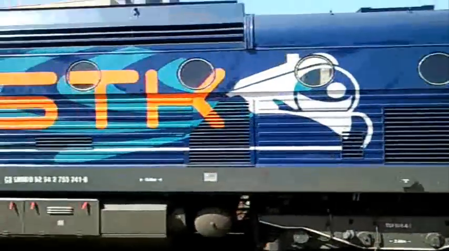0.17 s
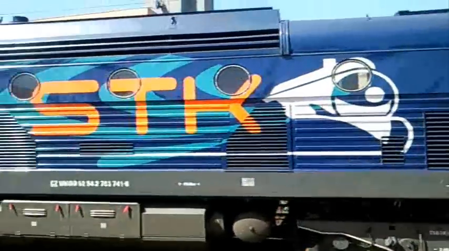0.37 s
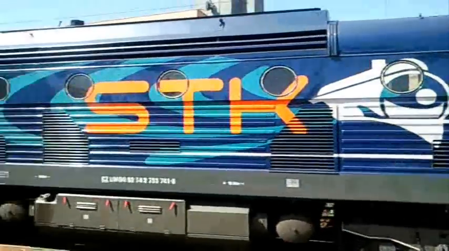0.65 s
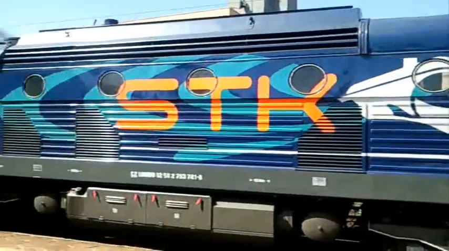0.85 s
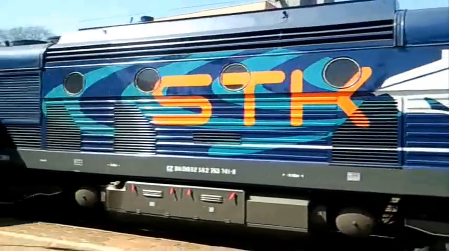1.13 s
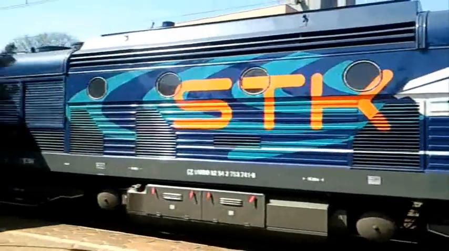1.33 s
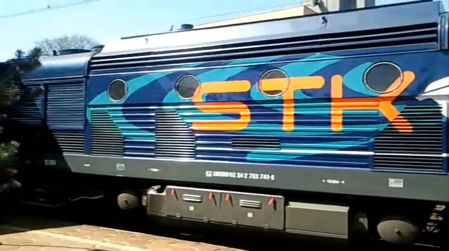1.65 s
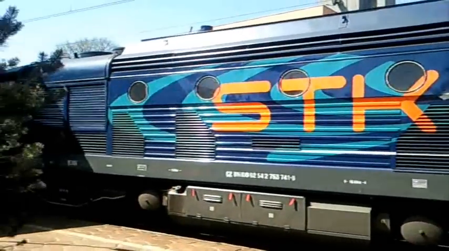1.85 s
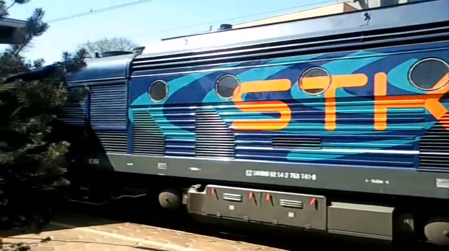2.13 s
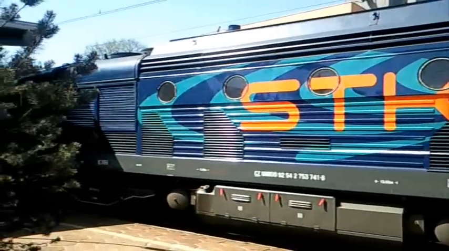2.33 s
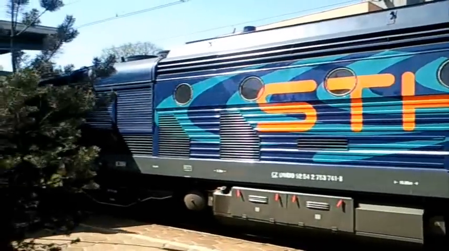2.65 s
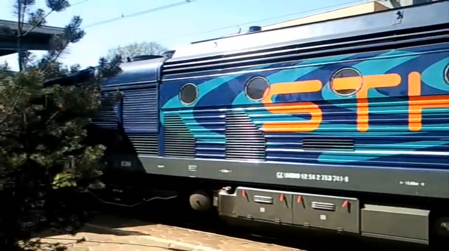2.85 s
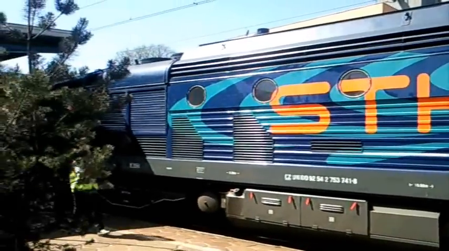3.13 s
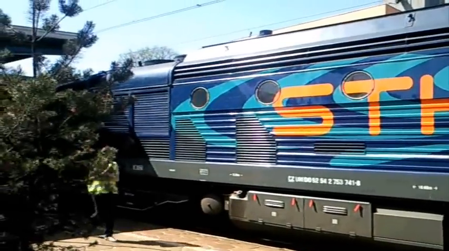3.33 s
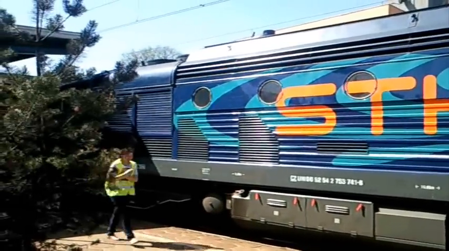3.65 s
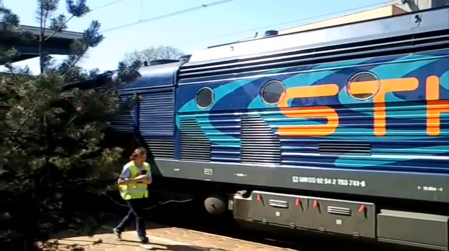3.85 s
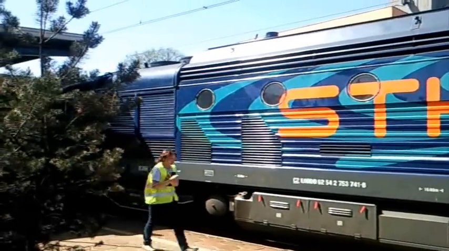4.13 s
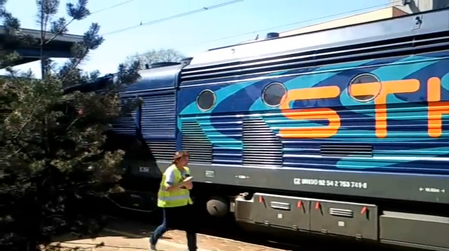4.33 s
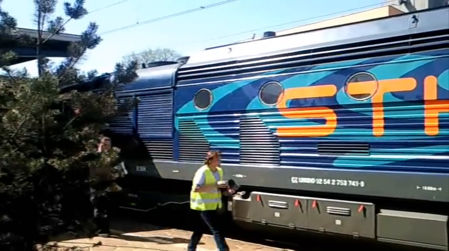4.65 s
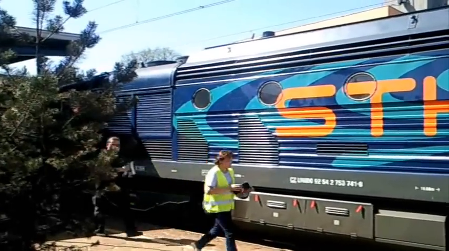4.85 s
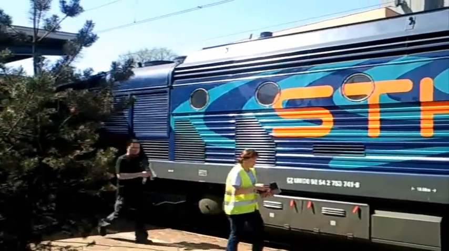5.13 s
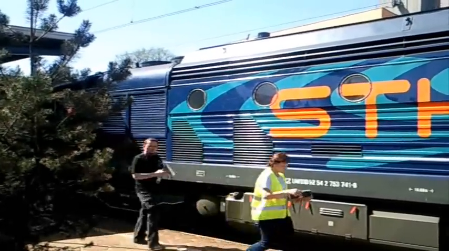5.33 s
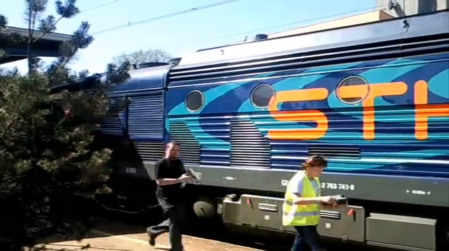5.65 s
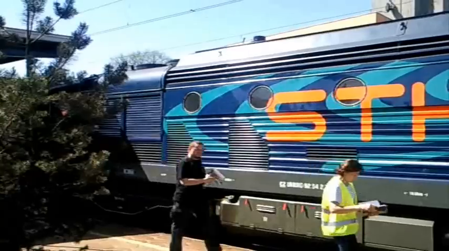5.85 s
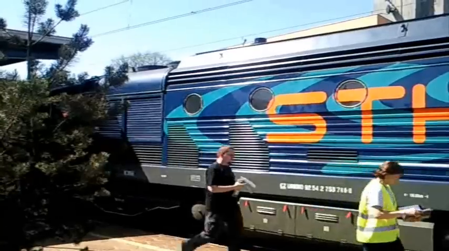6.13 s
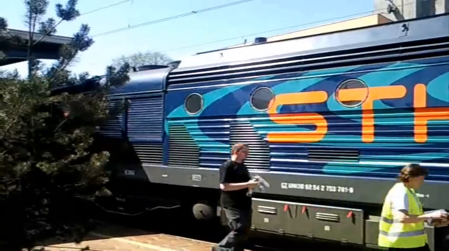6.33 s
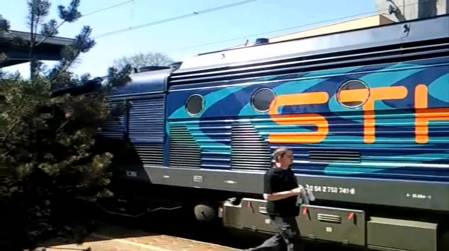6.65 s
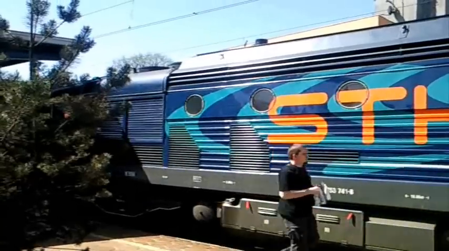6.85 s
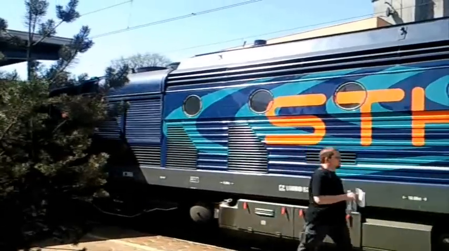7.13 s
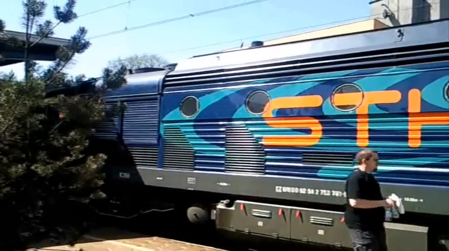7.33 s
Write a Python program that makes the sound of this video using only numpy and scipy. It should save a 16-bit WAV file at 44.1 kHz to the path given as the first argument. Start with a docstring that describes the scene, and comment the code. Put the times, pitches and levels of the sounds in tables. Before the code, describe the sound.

On an open-air platform, a standing electric locomotive runs its cooling blowers: a steady roar of air with a fluttering whine and a throbbing hum. Wind buffets the microphone hard for the first three seconds, popping and briefly overloading it, then eases to scattered thumps. A thin, faint squeal comes early, and a short puff of compressed air sounds about halfway, followed by a tiny chirp.

```python
"""An open-air platform, beside a standing electric locomotive with its cooling blowers running.
Air roars through the ducts and grilles, blades and motors whine, and two fans beat into a throb.
Gusts buffet the microphone, hard for the first three seconds, pop on its port and overload it.
A few thin squeals come and go, and near four seconds a valve lets off one puff of compressed air."""
import sys
import numpy as np
from scipy import signal
from scipy.fft import rfft, irfft
from scipy.io import wavfile

SR = 44100
rng = np.random.default_rng(int(sys.argv[2]) if len(sys.argv) > 2 else 0)


def transcribe(u):
    """Save the signal u as a 16-bit wav file named by the first command-line argument.

    u: samples, shape (n,) or (channels, n), limited to [-1, 1]; the rate is SR.
    q: integer samples, one column per channel.
    """
    v = np.clip(np.atleast_2d(u).T, -1, 1)
    q = np.round(v * 32767).astype(np.int16)
    wavfile.write(sys.argv[1], SR, q)


N = 329868
TIME = np.arange(N) / SR
FREQS = np.maximum(np.fft.rfftfreq(N, 1 / SR), 1)


def from_db(db):
    """Decibels to gain."""
    return 10 ** (np.asarray(db) / 20)


def rms_one(x):
    """Scale to an rms of 1."""
    return x / np.sqrt(np.mean(x ** 2) + 1e-20)


def in_time(rows):
    """Read rows of (seconds, value) at every sample."""
    return np.interp(TIME, *np.transpose(rows))


def at_hz(rows, hz):
    """Read rows of (Hz, value) on a log-frequency axis."""
    row_hz, values = np.transpose(rows)
    return np.interp(np.log(hz), np.log(row_hz), values)


def drift(rate_hz):
    """A smooth random wander with an rms of 1, mostly slower than the given rate."""
    step, settle = 40, 2000
    pole = np.exp(-2 * np.pi * rate_hz * step / SR)
    white = rng.standard_normal(N // step + settle + 2)
    slow = signal.lfilter([1], [1, -2 * pole, pole * pole], white)[settle:]
    return np.interp(np.arange(N) / step, np.arange(len(slow)), rms_one(slow))


def swell(centre_s, half_length_s, edge=2):
    """A rise and fall of height 1: a bell, or squarer with a higher edge."""
    distance = np.abs(TIME - centre_s) / half_length_s
    shape, near = np.zeros(N), distance < 2
    shape[near] = np.exp(-2 * distance[near] ** edge)
    return shape


def noise(spectrum_db):
    """Steady noise of rms 1 with the given spectrum."""
    return rms_one(irfft(rfft(rng.standard_normal(N)) * from_db(spectrum_db), N))


def tone(hz, waver, rate_hz):
    """A sine of rms 1 on a pitch curve; a share of it (waver, 0-1) varies at random."""
    amplitude = np.sqrt(2 * (1 - waver ** 2)) + waver * (drift(rate_hz) + 1j * drift(rate_hz))
    turns = np.cumsum(hz * np.ones(N)) / SR
    return np.real(amplitude * np.exp(2j * np.pi * turns))


# Rushing air, heard from the platform. Each row: frequency in Hz, relative level in dB.
AIRFLOW_SPECTRUM = [(30, -6.5), (70, -1.5), (170, -2), (330, -1.5), (480, -4), (530, -5.5), (650, -8.5),
                    (800, -6), (1080, -10.5), (1350, -6), (1650, -9), (2300, -6), (2600, -8), (2850, -15.5),
                    (3200, -16.5), (5300, -19), (6600, -25), (7900, -25.5)]
# Duct resonances. Each row: centre in Hz, width in Hz, lift above the airflow in dB.
DUCT_RESONANCES = [(167, 31, 2.5), (267.5, 42, 5), (335, 32, 1), (485, 38, 3.5), (981, 12, 1),
                   (1260, 270, 1), (1866, 100, 2.5)]
# The roar at the microphone. Each row: time in seconds, level in dB.
ROAR_LEVEL = [(0, -22.5), (2.0, -23.5), (5.7, -24.5), (7.48, -23.5)]
# The roar's treble, nearly steady, drifting by about half a decibel.
# Each row: time in seconds, gain in dB.
ROAR_TREBLE = [(0, 0), (1.1, 0), (2.0, -.3), (3.4, 0.5), (5.3, -0.2), (7.48, 0)]

def blower_roar(churn_db=0.69, treble_from_hz=670):
    """Turbulent air rings in the ducts and leaves through the side grilles, never quite evenly."""
    ducts_db = sum(db / (1 + (2 * (FREQS - hz) / width) ** 2) for hz, width, db in DUCT_RESONANCES)
    air = noise(at_hz(AIRFLOW_SPECTRUM, FREQS) + ducts_db)
    bass = irfft(rfft(air) / (1 + (FREQS / treble_from_hz) ** 4), N)
    treble = from_db(in_time(ROAR_TREBLE)) * (air - bass)
    return from_db(in_time(ROAR_LEVEL) + churn_db * drift(7.4)) * (bass + treble)


# Sizzle at the top of the hiss. Each row: lower and upper edge in Hz, gain of a full fleck in dB,
# threshold in standard deviations (higher makes flecks rarer).
FLECK_BANDS = [(6900, 7550, 5.5, .8), (7550, 8100, 7.5, .3)]

def flickering_top(hiss, gap_db=-18, flicker_hz=30):
    """The very top of the hiss flickers in short flecks, a fine sizzle."""
    spectrum = rfft(hiss)
    out = irfft(spectrum * (FREQS < FLECK_BANDS[0][0]), N)
    for low, high, db, threshold in FLECK_BANDS:
        band = irfft(spectrum * (FREQS >= low) * (FREQS < high), N)
        gap = (1 - np.tanh(4 * (drift(flicker_hz) - threshold))) / 2
        out += from_db(db + gap_db * gap) * band
    return out


# The side grille, higher and stronger while the microphone is close to it.
# Each row: time in seconds, centre in Hz, level in dB.
GRILLE_RUSH = [(0, 2776, -36), (.8, 2740, -33.5), (1.3, 2588, -42.5), (7.48, 2572, -39.5)]

def grille_rush(width_hz=140, surge_db=4.5, surge_hz=3.2):
    """Air sheds eddies off the slats: a narrow band of noise that swells and sinks."""
    rows = np.array(GRILLE_RUSH)
    hz, level_db = in_time(rows[:, [0, 1]]), in_time(rows[:, [0, 2]])
    surge = from_db(surge_db * drift(surge_hz))
    return from_db(level_db) * rms_one(surge * tone(hz, waver=0.92, rate_hz=width_hz))


# Blower tones, heard from the platform.
# Each row: multiple of the shaft rate, level in dB, wavering share from 0 to 1.
SHAFT_ORDERS = [(9.71, -42, 0.4), (26.36, -44, 0.6), (44.5, -47.5, 0.3), (45.05, -49, 0.3), (47.1, -46, .5),
                (49.6, -51, 0.5), (94, -51, 0.9), (114.2, -50, 0.4), (148.3, -43.5, 0.4)]

def blower_tones(shaft_hz=16.44, wander=0.000974, whine_hz=6008.5, whine_db=-59, churn_hz=4.5):
    """Blade and motor tones ride on one shaft, under a faint high whine; churning air roughens each."""
    shaft = shaft_hz * (1 + wander * drift(2.01))
    blades = sum(from_db(db) * tone(order * shaft, waver, churn_hz) for order, db, waver in SHAFT_ORDERS)
    return blades + from_db(whine_db) * tone(whine_hz, waver=.3, rate_hz=churn_hz)


def main_whine(hz=919.6, level_db=-37, flutter_hz=15.9, flutter_depth=.65, unsteady=0.1616):
    """The strongest blade tone holds its pitch and flutters unevenly, about once a turn of the shaft."""
    turns = np.cumsum(flutter_hz * (1 + unsteady * drift(4))) / SR
    flutter = 1 + flutter_depth * np.cos(2 * np.pi * turns)
    return from_db(level_db) * flutter * tone(hz, waver=.45, rate_hz=18)


def fan_hum(hum_hz=279.3, beat_hz=2.96, wander=0.0013, waver=0.48, churn_hz=11):
    """Two big fans on one supply run just out of step, so their hum throbs three times a second."""
    hz = hum_hz * (1 + wander * drift(2.5))
    slower_fan = from_db(-34) * tone(hz, waver, churn_hz)
    faster_fan = from_db(-37.5) * tone(hz + beat_hz, waver, churn_hz)
    return slower_fan + faster_fan


STRONG_GUST_DB = -15
# Wind across the platform: two gusts, then a light breeze. Each row: time in seconds, strength in dB.
WIND_STRENGTH = [(0, -19), (.5, -18.5), (1.0, -24), (1.5, -27.5), (1.63, -18), (2.05, -16), (2.62, -25),
                 (3.0, -32), (3.6, -33), (4.3, -37), (6.6, -42), (7.48, -30)]
# Large eddies right on the microphone. Each row: centre in seconds, half-length in seconds,
# strength above the wind in dB, extra treble in dB.
LARGE_EDDIES = [(.009, .0072, 9.5, -6), (0.036, 0.024, 7, 3.5), (0.133, 0.031, 7, 5),
                (0.206, 0.022, 7.5, 3), (0.28, 0.026, 4, 1), (0.337, .012, 9, 0), (0.364, .026, 12.5, -5),
                (0.446, 0.092, 3.5, -1.5), (0.526, 0.0089, 6.5, -1), (0.59, .015, 7.5, -3),
                (0.614, .01, 9.5, 2), (0.652, .014, 8.5, 3), (0.721, 0.023, 7.5, -2),
                (0.827, 0.031, 9.5, 2.5), (.923, 0.035, 6.5, -1), (1.006, .04, 4, -2), (1.086, .013, 7, 2),
                (1.238, .037, 10, -2), (1.356, 0.052, 6.5, -2), (1.559, 0.044, 12, -11),
                (1.637, 0.058, 5, 2), (1.683, 0.017, 10.5, -5), (1.769, .025, 5.5, -1),
                (1.872, 0.019, 11.5, -5), (1.91, .049, 5, -3), (1.957, .021, 10.5, -2),
                (1.983, 0.012, 10.5, -2), (2.011, 0.014, 8, 0), (2.049, 0.027, 7, -5), (2.103, .024, 8, 2),
                (2.145, .02, 3, 0), (2.253, .025, 13.5, -8), (2.282, 0.029, 12.5, -1),
                (2.317, 0.019, 10, -3), (2.39, 0.021, 10, -1), (2.441, 0.015, 11, -2),
                (2.575, 0.065, 8.5, 6), (2.739, 0.06, 17.5, 0.5), (2.83, 0.047, 11, 4),
                (2.919, 0.027, 10.5, -4), (3.104, 0.027, 5, -2), (3.252, 0.047, 12, 2), (3.46, .075, 14, 1),
                (3.672, 0.018, 10, -2), (3.739, 0.025, 16, 0), (4.857, .053, 19, -2), (5.037, 0.1, 11, 2),
                (5.317, .025, 11, -4), (5.49, .025, 17, -2), (6.849, 0.036, 17.5, -8),
                (6.978, 0.065, 15.5, -1), (7.357, .036, 12, 0)]

def eddies(swirl_db=1.8, swirl_hz=7.5, calm_swirl=.08, lumpy_db=2.3, evening_out=.35):
    """Eddies at the microphone set the wind's strength, extra treble and fast lumps, all in dB."""
    lumps_db = lumpy_db * drift(60)
    gust_db, crackle_db = in_time(WIND_STRENGTH), 0
    depth_db = swirl_db + calm_swirl * (STRONG_GUST_DB - gust_db)   # light wind is more fitful
    gust_db += depth_db * drift(swirl_hz)
    for centre_s, half_length_s, db, treble_db in LARGE_EDDIES:
        eddy = swell(centre_s, half_length_s)
        peak_db = np.interp(centre_s, *np.transpose(WIND_STRENGTH)) + db
        gust_db += eddy * (peak_db - gust_db)   # a large eddy takes over from the swirls
        lumps_db *= 1 - evening_out * eddy   # and sweeps away some of the small lumps
        crackle_db += eddy * treble_db
    return gust_db, crackle_db, lumps_db


# Rumble on the microphone in a strong gust. Each row: frequency in Hz, relative level in dB.
RUMBLE_SPECTRUM = [(20, -14), (45, -4), (85, 1.5), (150, 1.5), (230, -1), (350, -3), (550, -12),
                   (800, -23.5), (1200, -31.5), (2000, -45), (4000, -62)]
# How the rumble brightens. Each row: frequency in Hz, extra dB for each dB of gust.
RUMBLE_GROWTH = [(50, -0.23), (150, -0.09), (400, 0.74), (1000, 1.28)]

def wind(patchy_db=1.6, treble_hz=400):
    """Eddies make lumpy pressure at the port; faster air sheds smaller ones, so gusts are brighter."""
    gust_db, crackle_db, lumps_db = eddies()
    edges_hz = 14 * 2 ** np.arange(0, 8.6, .5)   # half octaves
    white = rng.standard_normal((2, N))
    out, power = 0, 0
    for k, (low, high) in enumerate(zip(edges_hz, edges_hz[1:])):
        hz = np.sqrt(low * high)
        bandpass = signal.butter(2, [low, high], "band", fs=SR, output="sos")
        band = from_db(at_hz(RUMBLE_SPECTRUM, hz)) * signal.sosfilt(bandpass, white[k % 2])
        power += np.mean(band ** 2)
        force_db = (gust_db - STRONG_GUST_DB) * (1 + at_hz(RUMBLE_GROWTH, hz))
        treble_share = hz ** 2 / (hz ** 2 + treble_hz ** 2)   # an eddy colours the upper bands
        out += band * from_db(force_db + treble_share * crackle_db + patchy_db * drift(29))
    lumps = rms_one(from_db(lumps_db))   # small eddies shake all bands together
    return from_db(STRONG_GUST_DB) * lumps * out / np.sqrt(power)


# Tiny fast eddies right at the microphone port.
# Each row: start in seconds, pitch in Hz, peak of the envelope in dB.
PORT_POPS = [(.336, 400, -6), (.709, 620, -10), (.836, 680, -8), (1.623, 560, -10), (1.686, 600, -5),
             (1.727, 650, -9), (1.764, 620, -5), (1.791, 600, -2), (1.867, 700, -2.5), (1.948, 480, -8),
             (2.012, 650, -5.5), (2.036, 620, -7), (2.098, 680, -4), (2.244, 220, -2), (2.305, 700, -9),
             (2.375, 380, -4)]

def pops(rise_s=.00065):
    """Each pop is a pressure kick that swings once or twice and is gone."""
    out = np.zeros(N)
    age = np.arange(SR // 50) / SR
    envelope = age / rise_s * np.exp(1 - age / rise_s)
    for start_s, hz, db in PORT_POPS:
        start = int(start_s * SR)
        out[start:start + len(age)] += from_db(db) * envelope * np.sin(2 * np.pi * hz * age)
    return out


# Thin metallic squeals, heard from the platform. Each row: centre in seconds, half-length in seconds,
# pitch in Hz, glide in Hz per second, level in dB, rasp from 0 to 1.
SQUEAL_HZ = 4700   # pitch of the first two
THIN_SQUEALS = [(.625, .06, SQUEAL_HZ, 0, -39.5, 0.1), (0.892, .19, SQUEAL_HZ, 0, -31.5, .28),
                (3.623, .08, 998, -1, -31, .5), (4.22, .017, 2590, 6000, -22.5, .45),
                (4.246, .012, 2600, 2000, -26, .45)]

def squeals(rasp_hz=60):
    """Each squeal is one slightly raspy tone that swells, holds and fades."""
    out = np.zeros(N)
    for centre_s, half_length_s, hz, glide, db, rasp in THIN_SQUEALS:
        envelope = swell(centre_s, half_length_s, edge=2.8)
        pitch = hz + glide * (TIME - centre_s)
        out += from_db(db) * envelope * tone(pitch, rasp, rasp_hz)
    return out


# The valve's jet, heard from the platform. Each row: frequency in Hz, relative level in dB.
JET_SPECTRUM = [(200, -7), (500, 3), (1000, 2), (2400, 3), (3100, -5), (5000, -2.5), (6500, -6.5),
                (7200, 0.5), (8000, 0)]

def air_puff(start_s=3.808, attack_s=.018, hold_s=.095, release_s=.062,
             spurt_db=-15.5, spurt_decay_s=.012, flow_db=-21.3, sputter_db=1.6, sputter_hz=35):
    """A valve opens, a spurt of compressed air sinks to a sputtering flow, and the valve shuts."""
    opening = np.clip((TIME - start_s) / attack_s, 0, 1) ** 2
    open_s = np.maximum(TIME - start_s - attack_s, 0)
    flow = from_db(flow_db) + from_db(spurt_db) * np.exp(-open_s / spurt_decay_s)
    shutting = np.exp(-np.maximum(open_s - hold_s, 0) / release_s)
    sputter = from_db(sputter_db * drift(sputter_hz))
    return opening * flow * shutting * sputter * noise(at_hz(JET_SPECTRUM, FREQS))


def scene():
    """The locomotive and the wind at one microphone on the platform."""
    air = flickering_top(blower_roar() + air_puff()) + grille_rush()
    tones = blower_tones() + main_whine() + fan_hum() + squeals()
    return (air + tones + wind() + pops())[None, :]


def record(dry, cutoff_hz=7880):
    """The strongest buffets overload the microphone and flatten at full scale; the top is cut."""
    flattened = dry / (1 + dry ** 10) ** (1 / 10)
    lowpass = signal.ellip(12, .1, 80, cutoff_hz, fs=SR, output="sos")
    return signal.sosfilt(lowpass, flattened)


dry = scene()
out = record(dry)
transcribe(out)
```